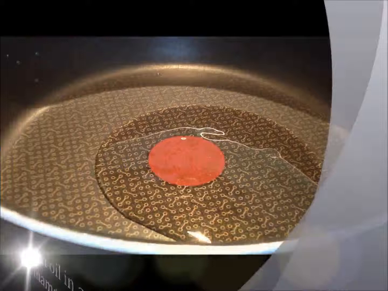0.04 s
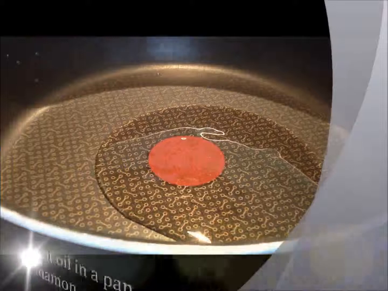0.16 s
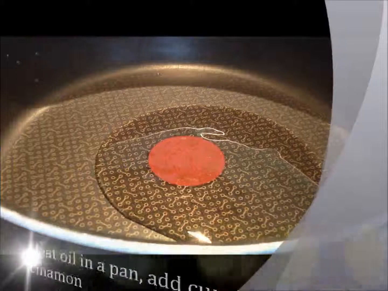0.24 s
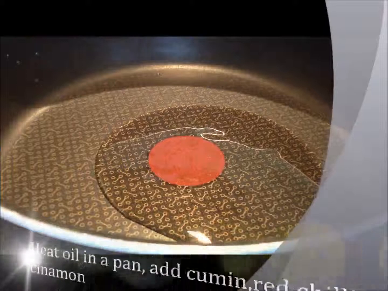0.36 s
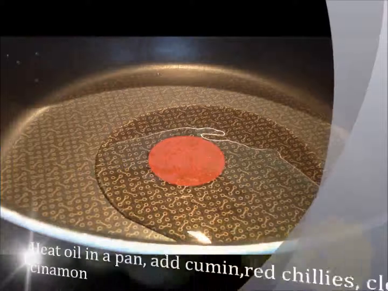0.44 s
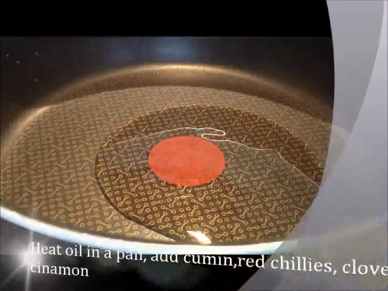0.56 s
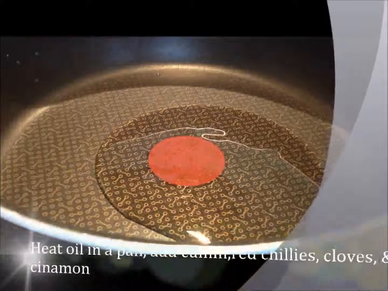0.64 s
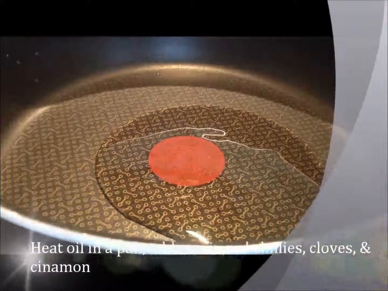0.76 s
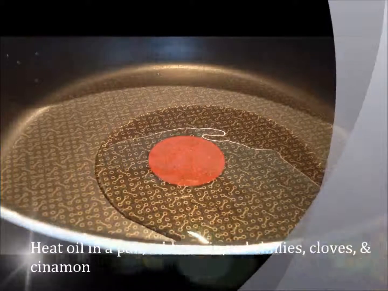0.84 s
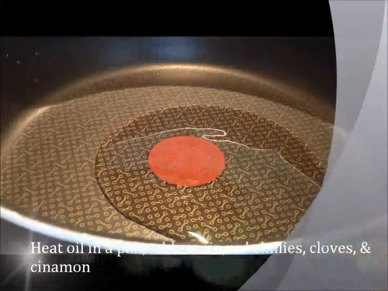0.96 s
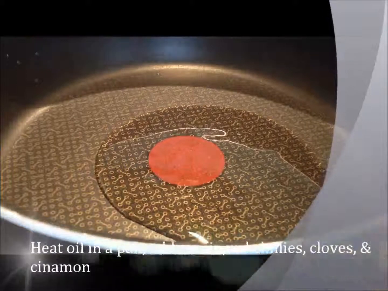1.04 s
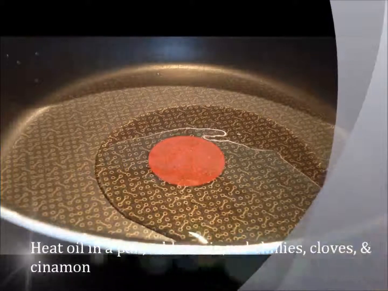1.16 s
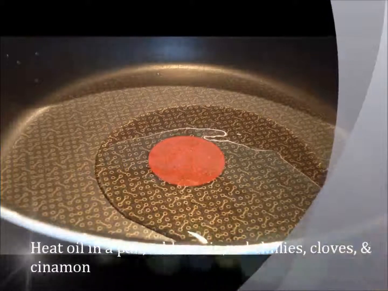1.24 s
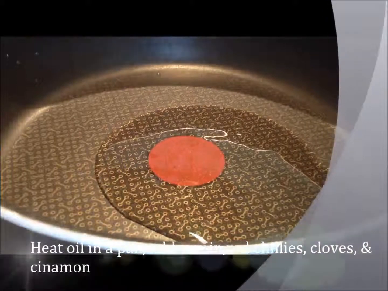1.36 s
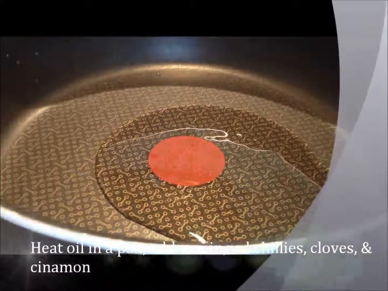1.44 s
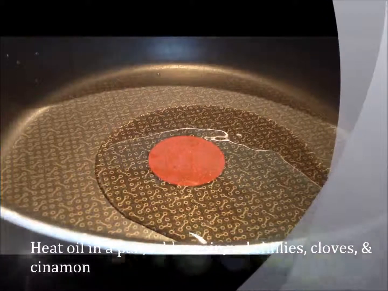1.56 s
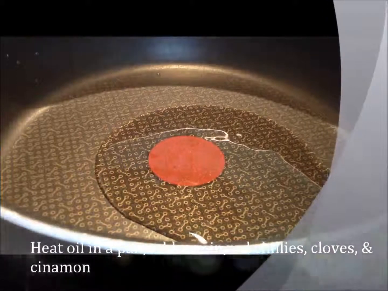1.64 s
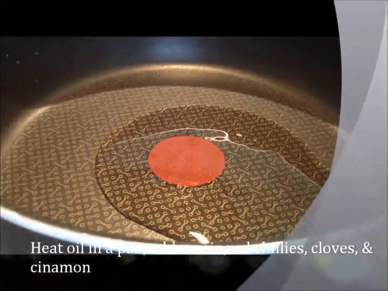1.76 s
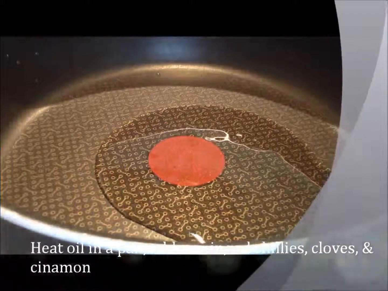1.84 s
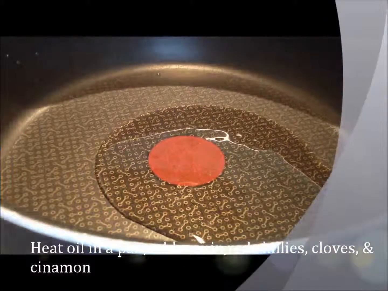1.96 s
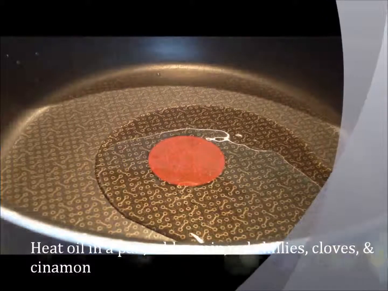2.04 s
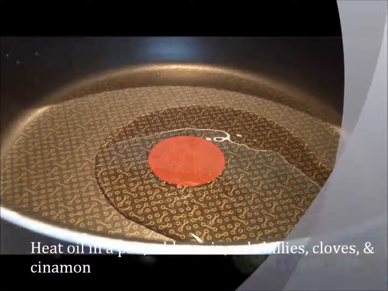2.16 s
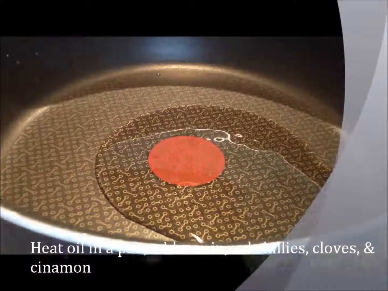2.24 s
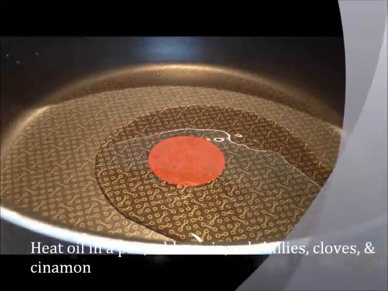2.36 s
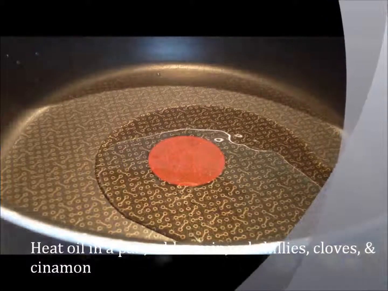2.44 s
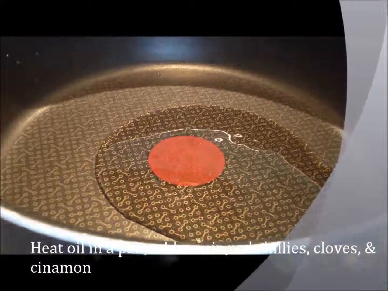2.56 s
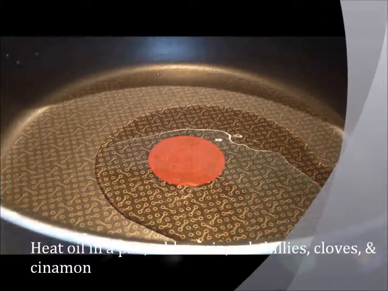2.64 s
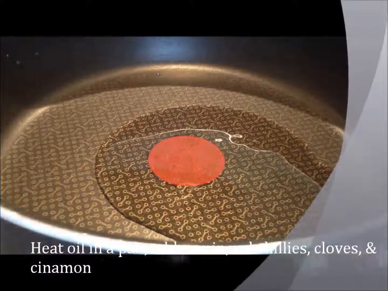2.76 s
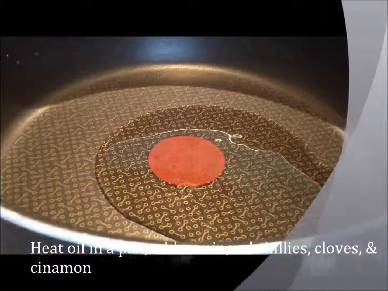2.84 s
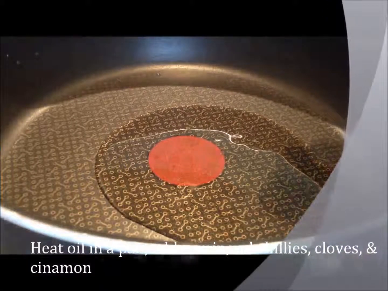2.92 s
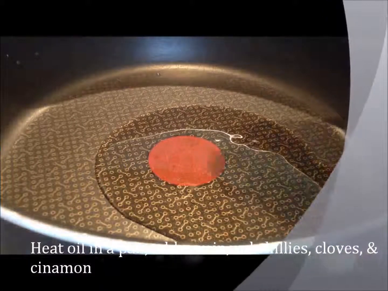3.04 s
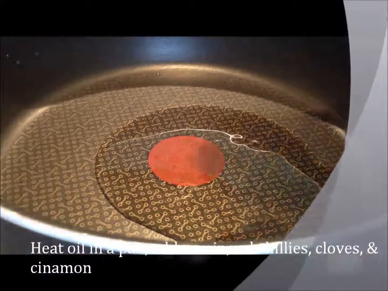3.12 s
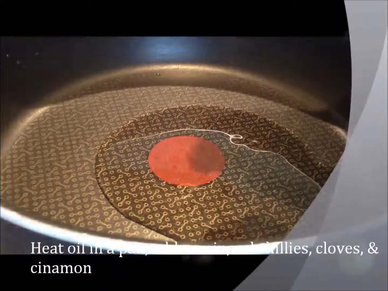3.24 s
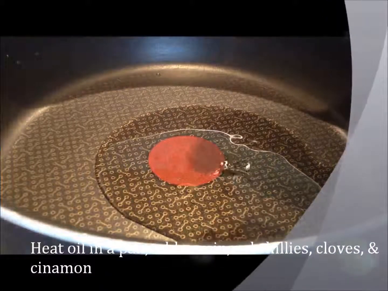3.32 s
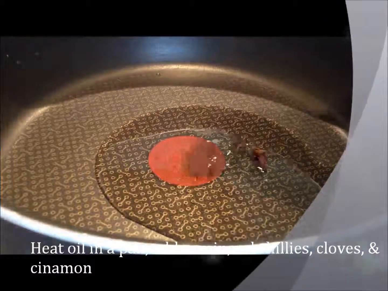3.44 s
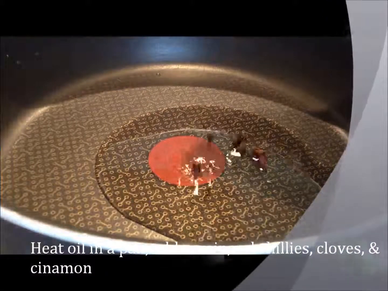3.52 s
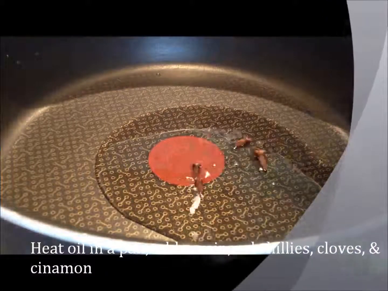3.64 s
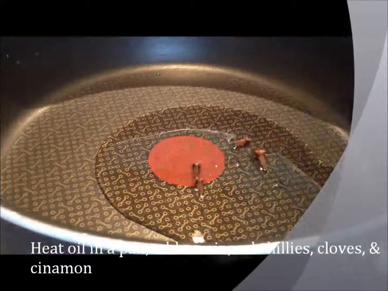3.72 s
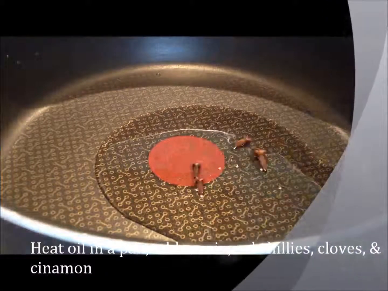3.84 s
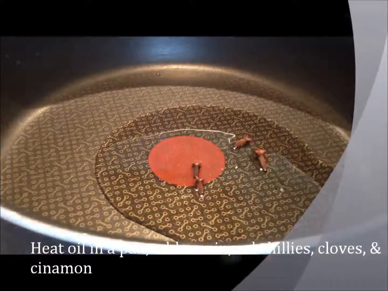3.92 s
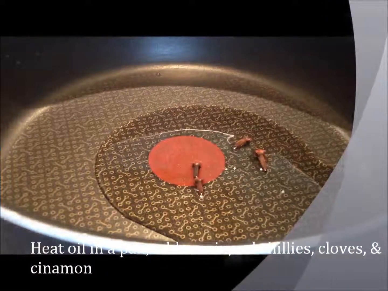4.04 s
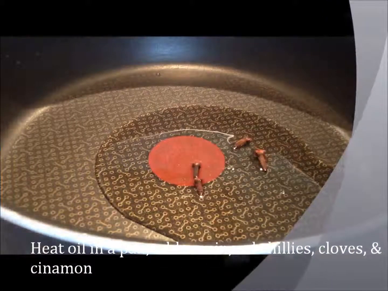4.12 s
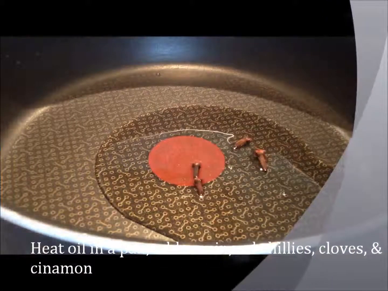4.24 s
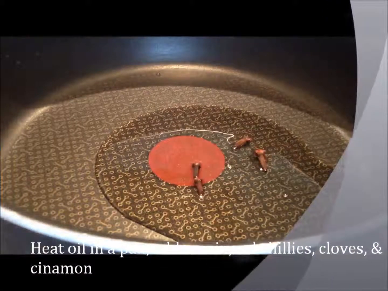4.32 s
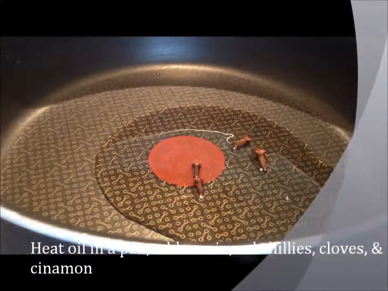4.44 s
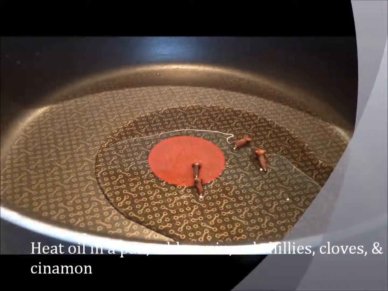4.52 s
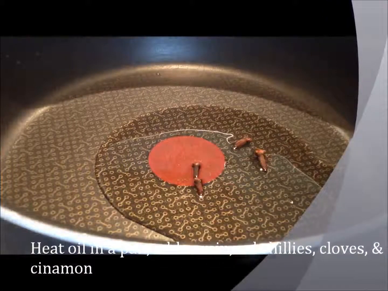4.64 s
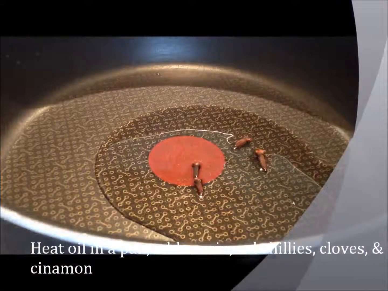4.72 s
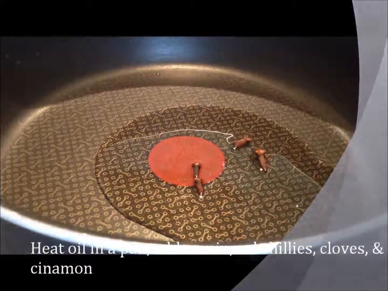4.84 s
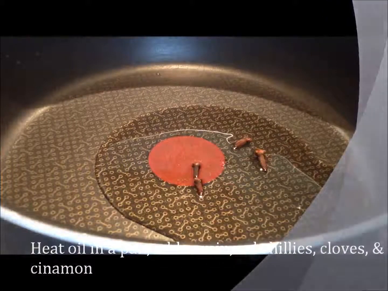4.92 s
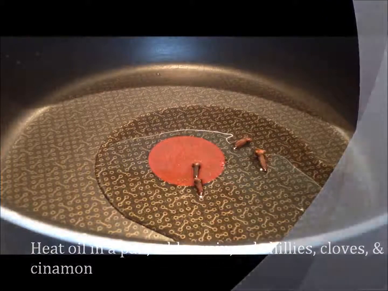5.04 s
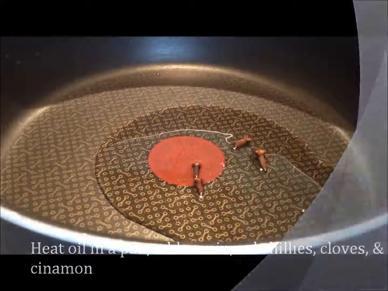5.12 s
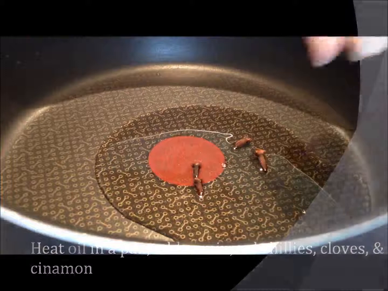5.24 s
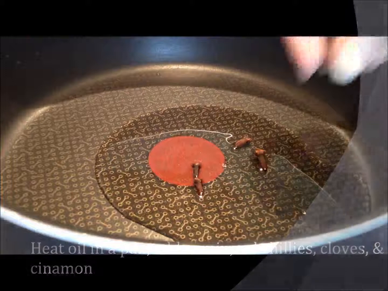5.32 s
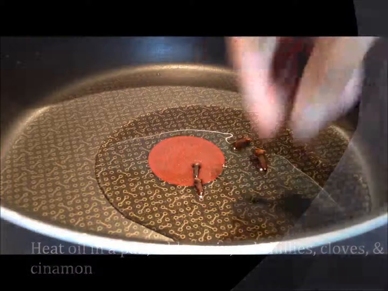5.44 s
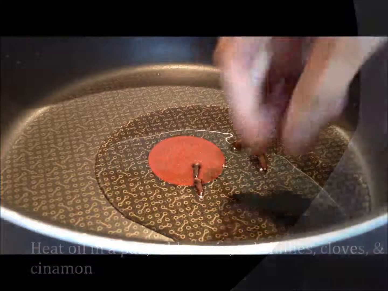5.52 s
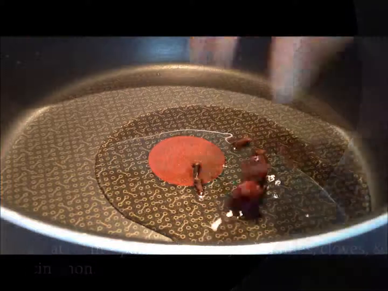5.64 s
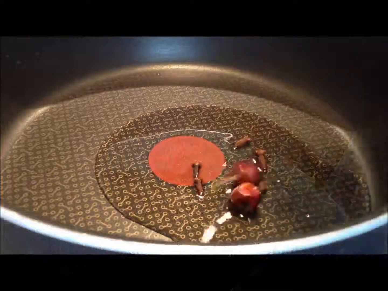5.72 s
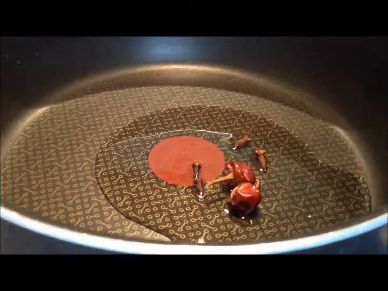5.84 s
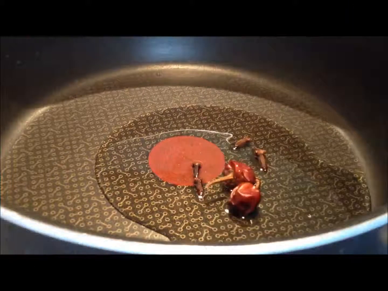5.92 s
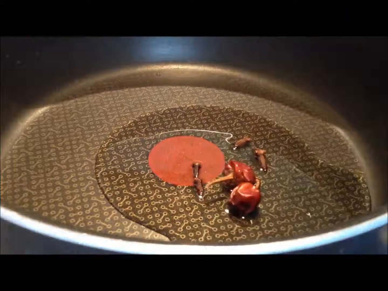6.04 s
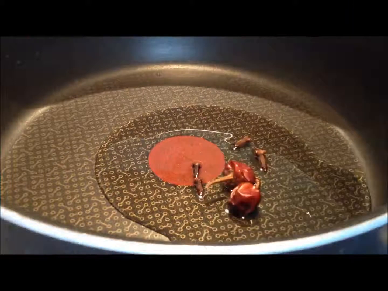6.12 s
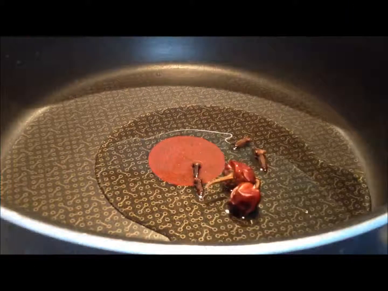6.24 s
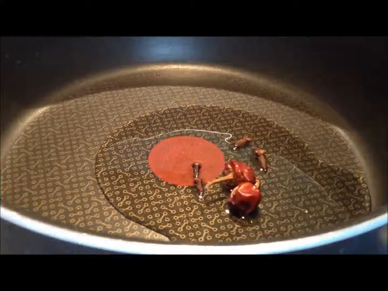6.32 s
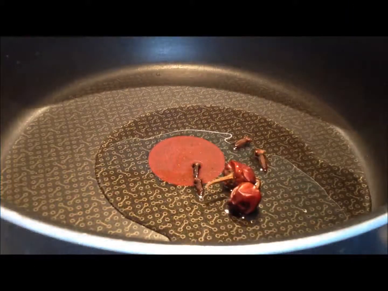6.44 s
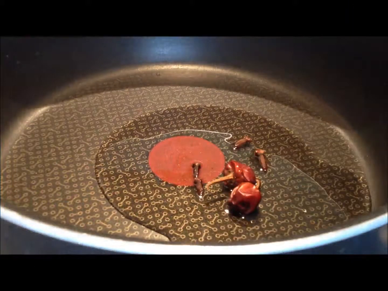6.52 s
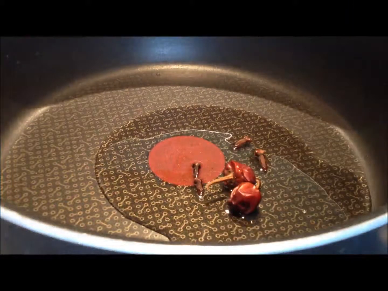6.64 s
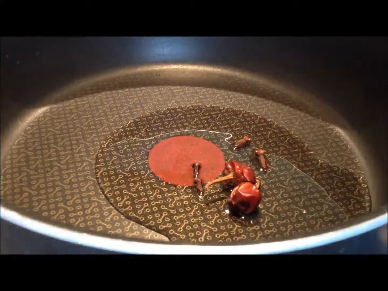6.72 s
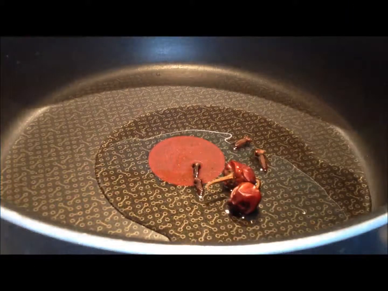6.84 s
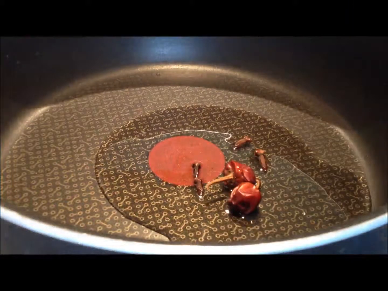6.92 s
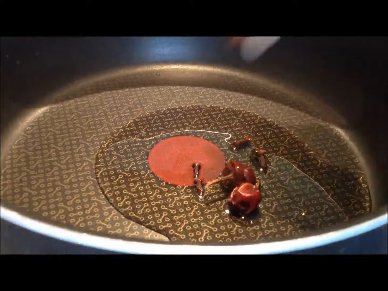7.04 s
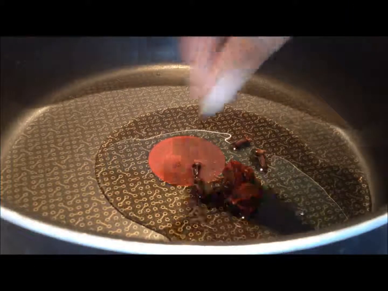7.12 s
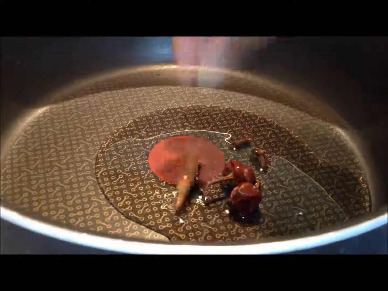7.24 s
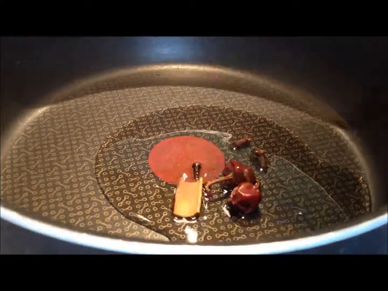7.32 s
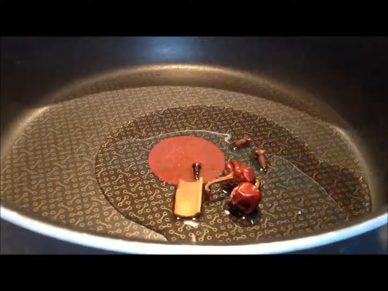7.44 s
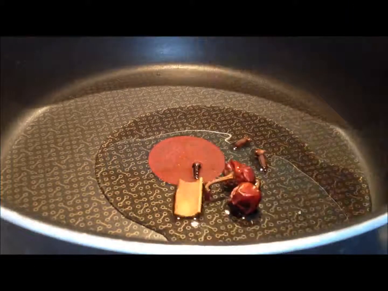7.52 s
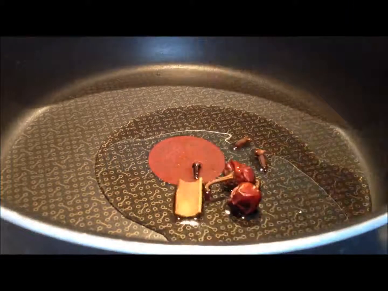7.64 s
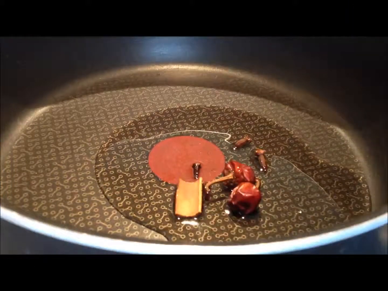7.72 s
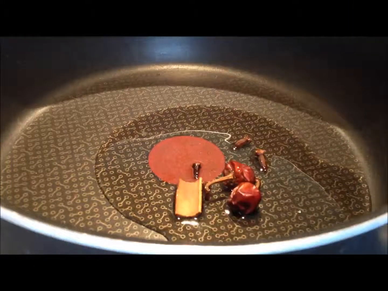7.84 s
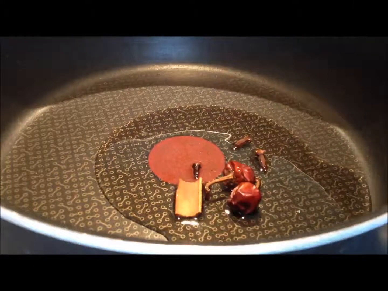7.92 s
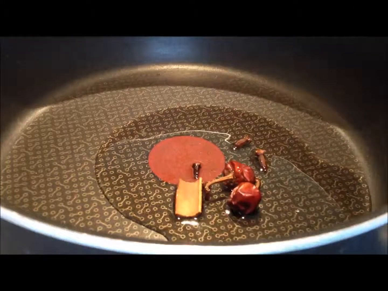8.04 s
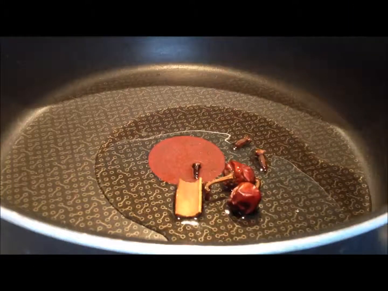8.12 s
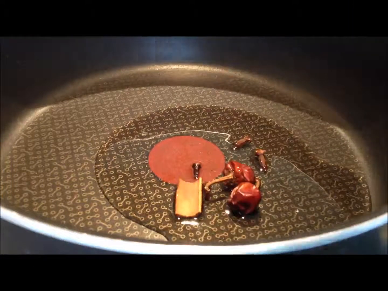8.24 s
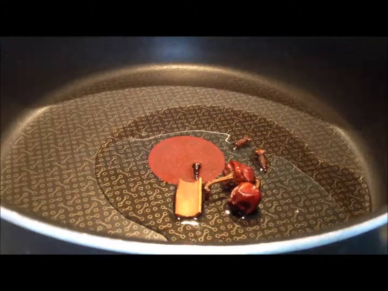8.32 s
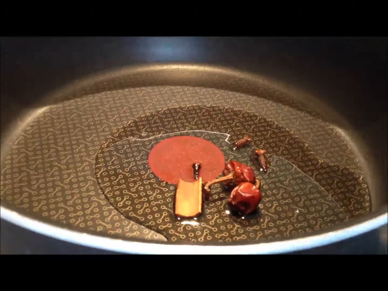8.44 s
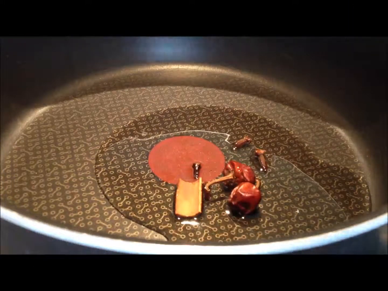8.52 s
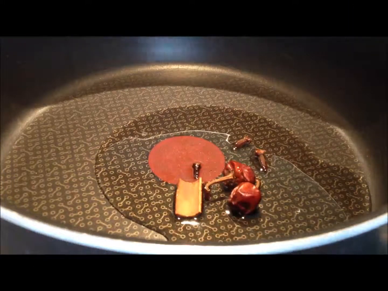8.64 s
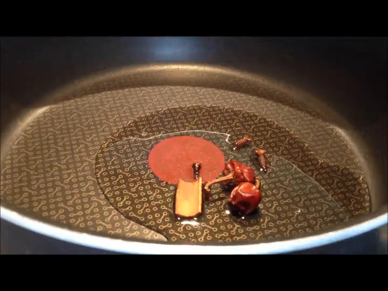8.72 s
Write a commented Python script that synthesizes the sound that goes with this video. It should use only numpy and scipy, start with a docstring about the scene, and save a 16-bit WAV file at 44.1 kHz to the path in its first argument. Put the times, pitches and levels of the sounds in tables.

```python
"""Dry spices in hot oil

Cloves, dried red chillies and a piece of cinnamon bark drop into a little hot oil in a nonstick pan.
Each landing is a tick and a crack of shaped noise over damped pan modes. Random snaps make the oil fizz and
the chillies rustle, and short noise bursts make it pop. A small kitchen adds rumble, hiss, a low drone, scuffs,
soft knocks and reflections; a gain control turns down the loudest landings."""
import sys
import numpy as np
from scipy import signal
from scipy.fft import rfft, irfft, next_fast_len
from scipy.io import wavfile
from scipy.ndimage import uniform_filter1d

SR = 44100
rng = np.random.default_rng(int(sys.argv[2]) if len(sys.argv) > 2 else 0)


def put_to_file(sound):
    """Save the sound as 16-bit audio at rate SR, in the file named by the first command-line argument."""
    columns = np.atleast_2d(sound).T  # one column per channel
    safe = np.clip(columns, -1, 1)
    whole_steps = np.round(safe * 32767)
    wavfile.write(sys.argv[1], SR, whole_steps.astype(np.int16))


N = 386757

# The bright colour of bursting bubbles and of the bursts of hiss after a landing.
# Each row: frequency in Hz, relative density in dB per Hz.
SPRAY = [(300, -29), (1100, -8), (2900, -6.5), (4500, -19), (6000, -20), (7800, 6), (9500, -11),
         (12000, -5), (14500, -5), (16000, -9)]


def amp(db):
    """Decibels to gain."""
    return 10 ** (np.asarray(db) / 20)


def unit(x):
    """Scales to rms 1."""
    return x / np.sqrt(np.mean(x ** 2) + 1e-20)


def read(points, hz):
    """Reads a spectrum on a log-frequency axis."""
    f, value = np.transpose(points)
    return np.interp(np.log(hz + 1), np.log(f + 1), value)


def colour(x, points):
    """Filters x by a spectrum in dB."""
    size = next_fast_len(len(x), True)
    gain = amp(read(points, np.fft.rfftfreq(size, 1 / SR)))
    return irfft(rfft(x, size) * gain, size)[:len(x)]


def white(size):
    """White noise of 0 dB per Hz."""
    return rng.standard_normal(size) * np.sqrt(SR / 2)


def add(mix, s, sound):
    """Mixes a sound in at time s, in seconds."""
    part = mix[round(s * SR):][:len(sound)]
    part += sound[:len(part)]


def arch(start, length):
    """A gain that swells from 0 to 1 and dies again within length seconds."""
    u = np.clip((np.arange(N) / SR - start) / length, 0, 1)
    return 4 * u * (1 - u)


def crackle(size, per_s, spread_db, spectrum):
    """A random train of tiny snaps, a few larger than the rest, scaled to rms 1."""
    size_db = spread_db * np.minimum(rng.exponential(1, size), 3)
    strength = amp(size_db) * rng.choice([-1, 1], size)
    snaps = strength * (rng.random(size) < per_s / SR)
    return unit(colour(snaps, spectrum))


def background(waver_db=1.0):
    """Low rumble and thin hiss with a few narrow singing bands; the level wavers a little."""
    # The steady floor. Each row: frequency in Hz, density in dB per Hz.
    floor = [(25, -116), (50, -109), (68, -105), (95, -91), (140, -81.5), (205, -80.5), (300, -89),
             (500, -95.5), (1200, -99), (1900, -100), (3700, -99), (4300, -105), (6300, -99), (10500, -105),
             (15000, -104)]
    # Bands that sing in the hiss. Each row: centre in Hz, width in Hz, density at the centre in dB per Hz.
    whines = [(1760, 160, -93), (3923, 63, -92), (5820, 200, -93.5), (6543, 153, -85), (12100, 250, -101),
              (14000, 290, -87), (14880, 190, -80.5)]
    hz = np.fft.rfftfreq(N, 1 / SR)
    power = amp(read(floor, hz)) ** 2
    for centre, width, db in whines:
        power = power + amp(db) ** 2 / (1 + ((hz - centre) / width) ** 2 * 2) ** 2
    waver = unit(irfft(rfft(white(N)) * (hz < 8), N))  # only movement slower than 8 Hz
    noise = irfft(rfft(white(N)) * np.sqrt(power), N)
    return noise * amp(waver_db * waver)


def drone():
    """A faint low sine that swells and fades, a little higher each time."""
    # Each row: start in seconds, length in seconds, pitch in Hz, rms level at the top of the swell in dB.
    drones = [(.42, 0.87, 81.5, -74.5), (1.15, 0.58, 86, -67.5), (1.85, 0.61, 97, -65.5)]
    t, out = np.arange(N) / SR, np.zeros(N)
    for s, length, hz, db in drones:
        out += np.sqrt(2) * amp(db) * arch(s, length) * np.sin(2 * np.pi * hz * t)
    return out


def kitchen(x, first_echo=0.0045):
    """Dense reflections from near walls: random taps after first_echo seconds, the treble dying first."""
    # Each row: frequency in Hz, decay time t60 in seconds.
    decay = [(200, 1), (1000, 0.59), (3000, 0.46), (7000, 0.41), (14000, 0.38)]
    taps = rng.choice([-1., 1.], SR // 2) * (rng.random(SR // 2) < 4000 / SR)
    taps *= np.arange(len(taps)) / SR > first_echo
    hz, t, z = signal.stft(taps, SR, nperseg=256)
    fade = amp(-60 * t / read(decay, hz)[:, None])
    tail = signal.istft(z * fade, SR, nperseg=256)[1]
    return signal.fftconvolve(x, tail / np.linalg.norm(tail))[:N]


def scuffs():
    """Faint scuffs of handling: grainy friction in one broad resonance."""
    # Each row: start in seconds, length in seconds, centre in Hz, width in Hz, rms level before the swell in dB.
    handling = [(0.211, 0.1, 1250, 500, -64), (0.29, 0.093, 3070, 250, -56.5),
                (0.298, 0.1, 1300, 2000, -57.5), (0.477, 0.17, 2130, 1400, -63.5)]
    out = np.zeros(N)
    for s, length, hz, width_hz, db in handling:
        size, r = int(length * SR), np.exp(-np.pi * width_hz / SR)
        grains = white(size) * (rng.random(size) < 1500 / SR)
        rub = signal.lfilter([1, 0, -1], [1, -2 * r * np.cos(2 * np.pi * hz / SR), r * r], grains)
        add(out, s, amp(db) * unit(rub) * np.hanning(size) ** .5)
    return out


def knocks():
    """Soft knocks around the stove: a damped resonance swells and dies in a few cycles, with a dull rattle."""
    # Each row: start in seconds, level in dB, resonance in Hz, rise in seconds,
    # level of the rattle against the knock in dB, decay time t60 of the rattle in seconds.
    bumps = [(1.478, -47.5, 444, 0.0018, 0.5, 0.052), (6.349, -45, 370, 0.0024, -1, 0.1),
             (6.684, -35.5, 1440, 0.0011, -11.5, 0.095), (6.693, -53.5, 415, 0.00078, 4, 0.074),
             (8.484, -30.5, 825, 0.00094, -10, .18), (8.4855, -36.5, 300, 0.0028, -13, 0.1),
             (8.4879, -21, 480, 0.0029, -25, 0.27)]
    # The colour of the rattle. Each row: frequency in Hz, relative density in dB per Hz.
    dull = [(80, -27), (250, 12.5), (900, 8.5), (1400, 2), (1900, -7), (2700, -8), (5000, -26)]
    out, t = np.zeros(N), np.arange(SR // 4) / SR
    for s, db, hz, rise, rattle_db, rattle_t60 in bumps:
        swell = (t / rise * np.exp(1 - t / rise)) ** 2
        body = swell * np.sin(2 * np.pi * hz * t)
        rattle_fade = amp(rattle_db - 60 * t / rattle_t60) * (1 - np.exp(-t / rise))
        rattle = unit(colour(white(len(t)), dull)) * rattle_fade
        add(out, s, amp(db) * (body + rattle))
    return out


def oil(simmer_db=-59, flare_t60=2.5, burst_t60=.09, puff_db=2.5):
    """Steam fizzes out of the oil in little puffs; after two landings hiss bursts out and the fizz swells."""
    # Spells of livelier simmering. Each row: start in seconds, length in seconds, level added at the top in dB.
    simmers = [(.78, 0.27, -58.5), (1.42, 0.18, -55), (2.498, 0.97, -59)]
    # Bursts of hiss after a landing: the clove's spray, the chilli's dry rustle.
    # Each row: start in seconds, first level of the livelier fizz in dB, first level of the burst in dB.
    flares = [(3.461, -51, -29), (5.601, -58, -35)]
    # The hiss of escaping steam. Each row: frequency in Hz, relative density in dB per Hz.
    hiss = [(500, -18), (2900, -7), (4500, -33.5), (6300, -3.5), (8000, -1), (9600, -8.5), (12000, -15.5),
            (16000, -10)]
    t = np.arange(N) / SR
    power = np.full(N, amp(simmer_db) ** 2)
    for s, length, db in simmers:
        power += (amp(db) * arch(s, length)) ** 2
    bursts, short = np.zeros(N), t[:SR // 4]
    for s, flare_db, burst_db in flares:
        add(power, s, amp(flare_db - 60 * t / flare_t60) ** 2)
        burst_fade = amp(burst_db - 60 * short / burst_t60)
        add(bursts, s, unit(colour(white(len(short)), SPRAY)) * burst_fade)
    # noise smoothed over about 30 ms puffs the steam up and down
    puffs = unit(signal.oaconvolve(white(N), np.hanning(1300), "same"))
    steam = unit(crackle(N, 3000, 2.7, hiss) * amp(puff_db * np.clip(puffs, -2, 2)))
    return steam * np.sqrt(power) + bursts


def pops(snap_db=7.0, snap_t60=0.012, spray_db=-5, spray_t60=0.068, tick_t60=0.022,
         tick_low_hz=900, tick_high_hz=3200, small_per_s=3, small_db=-61.5):
    """A bubble bursts with a sharp snap and a short spray; large ones tick on the pan, small ones come at random."""
    # The largest bubbles. Each row: start in seconds, level in dB (snap and spray are set against it),
    # first level of the tick on the pan in dB.
    bubbles = [(1.259, -44, -53), (2.148, -52, -58), (2.451, -45, -58), (2.600, -47.5, -62),
               (2.761, -46.5, -64), (3.669, -45.5, -69), (3.939, -49.5, -62), (4.318, -50, -53),
               (5.860, -46.5, -51), (6.238, -52, -45.5), (6.513, -45, -40.5), (7.108, -45.5, -50)]
    out, t = np.zeros(N), np.arange(SR // 8) / SR
    fade = amp(snap_db - 60 * t / snap_t60) + amp(spray_db - 60 * t / spray_t60)
    band = signal.butter(2, [tick_low_hz, tick_high_hz], "band", fs=SR, output="sos")
    for s, db, tick_db in bubbles:
        tick = unit(signal.sosfilt(band, white(len(t)))) * amp(tick_db - 60 * t / tick_t60)
        burst = unit(colour(white(len(t)), SPRAY)) * amp(db) * fade
        add(out, s, burst + tick)
    # small_db caps the random sizes
    small = (rng.random(N) < small_per_s / SR) * amp(small_db) * rng.random(N)
    return out + unit(colour(white(N), SPRAY)) * signal.oaconvolve(small, fade)[:N]


def skin(brightness):
    """The colour of a chilli's skin, tilted by so many dB per octave."""
    # Each row: frequency in Hz, relative density before the tilt in dB per Hz.
    papery = [(500, -36), (1500, -16), (2800, -11), (4300, -11.5), (6000, 0), (7400, 4), (9300, -2),
              (12000, 0), (14300, 0), (16000, -2)]
    return [(hz, db + brightness * np.log2(hz / papery[0][0])) for hz, db in papery]


def chillies(snaps_per_s=1300, spread_db=1.5, clump_db=2.0, crinkle_db=1.5, crinkle_rise=0.0018):
    """Papery skins rub in clumps of tiny snaps, each rub one swell, and now and then buckle."""
    # Chillies rub together in the hand and settle in the pan. Each row: start in seconds, length in seconds,
    # rms level before the swell in dB, brightness in dB per octave.
    rubs = [(4.06, 0.22, -43, 1.5), (4.359, 0.07, -46.5, -2.5), (4.418, 0.19, -55, 0),
            (4.558, 0.3, -47.5, 0), (4.686, 0.062, -47.5, -2.5), (4.837, 0.1, -41.5, -2),
            (4.94, 0.085, -43.5, -2), (5.01, 0.14, -50.5, 0), (5.195, 0.055, -46.5, -1.5),
            (5.27, 0.19, -42.5, 4), (5.466, 0.12, -46, -1), (5.58, .17, -42.5, 1)]
    # Skins buckle. Each row: start in seconds, relative level in dB (crinkle_db is added),
    # decay time t60 in seconds, brightness in dB per octave.
    crinkles = [(3.999, -39, 0.18, 1.5), (4.059, -29.5, 0.18, 4.5), (4.112, -29, 0.085, 0.5),
                (4.135, -34, 0.15, 1.5), (4.178, -37, 0.12, -1.5), (4.802, -33, 0.081, 2),
                (4.883, -29.5, 0.025, -1.5), (4.896, -35, 0.027, -1), (4.975, -36, 0.086, 2),
                (5.382, -36, 0.043, 2), (5.514, -30, 0.053, -0.5)]
    out = np.zeros(N)
    for s, length, db, brightness in rubs:
        size = int(length * SR)
        clumps = unit(uniform_filter1d(white(size), size=200))
        snaps = crackle(size, snaps_per_s, spread_db, skin(brightness))
        rub = unit(snaps * amp(clump_db * clumps))
        add(out, s, amp(db) * rub * np.sin(np.linspace(0, np.pi, size)))
    t = np.arange(SR // 4) / SR
    for s, db, t60, brightness in crinkles:
        snaps = crackle(len(t), 9000, 2.2, skin(brightness))
        fade = amp(db + crinkle_db - 60 * t / t60) * (1 - np.exp(-t / crinkle_rise))
        add(out, s, snaps * fade)
    return out


def landings(crack_db=-2.5, crack_t60=0.056, buzz_db=-27, buzz_t60=0.18, ring_db=-1, ring_rise=0.003,
             crack_rise=0.0012, clang_db=-17, clang_width_hz=85, clang_from_hz=4500, tick_db=-2.0, tick_t60=0.014):
    """A hard spice strikes the pan: a tick, a crack, a short bright clang, and the strong modes that ring on."""
    # The pitches of the pan's modes in Hz.
    pan_hz = [530, 1012, 1642, 2038, 2538, 2875, 3460, 3802, 3972, 4311, 5050, 5312, 5535, 5867, 5990, 6401,
              6600, 6735, 7066, 7208, 7440, 8003, 8089, 8690, 9890, 10075, 11240]
    # The ring of each mode; each spice strikes its own spot, and the bark lands on its tip, then falls flat.
    # Each row: decay time t60 in seconds, relative level in dB under a clove, a chilli, the bark's tip, its side.
    pan_modes = [(0.42, -44.5, -30, -29.5, -58), (0.13, -28.5, -11, -19, -21.5),
                 (0.13, -24, -7.5, -29, -18), (.13, -22.5, -23, -8, -44), (0.15, -34, -20, -17, -36.5),
                 (0.17, -17, -18, -15, -24.5), (0.12, -29, -24, -44, -42), (0.18, -32.5, -26, -51, -30.5),
                 (0.18, -59, -31, -23.5, -48), (0.14, -28, -51, -17.5, -40), (0.21, -32.5, -35, -29.5, -32),
                 (0.11, -26.5, -48, -42, -30), (0.14, -29, -49, -49, -52), (0.13, -21.5, -29, -31, -45),
                 (0.11, -30, -32, -26, -43), (0.05, -31, -21, -42, -37), (.15, -38, -46, -35.5, -34),
                 (0.13, -24, -33, -42, -38), (0.082, -29, -26.5, -29.5, -41), (0.086, -21.5, -43, -30, -39),
                 (.14, -42, -39, -50, -50), (0.1, -24, -44, -20.5, -50), (0.19, -35, -34, -33.5, -50),
                 (0.13, -31, -60.5, -34, -55), (0.058, -27.5, -43, -26, -58), (0.058, -28.5, -45, -32, -58),
                 (0.073, -28, -52, -49.5, -66)]
    # What strikes, in the order of the level columns.
    spices = ["clove", "chilli", "bark tip", "bark side"]
    # The crack of contact. Each row: frequency in Hz, relative density in dB per Hz for each of the spices.
    contacts = [(100, -84, -88, -91, -92), (332, -91, -79, -85.5, -77), (596, -58.5, -49, -51.5, -56),
                (1420, -66, -64, -53, -54.5), (2050, -60, -60, -53, -58), (3260, -57, -45, -41, -55.5),
                (4530, -60, -62, -55.5, -56.5), (6100, -46.5, -53.5, -37, -68), (8160, -61, -66, -51, -64),
                (9040, -61, -52, -52, -76), (9650, -64, -56.5, -65.5, -85), (12400, -59, -57.5, -55, -79),
                (15000, -69, -63, -70.5, -79)]
    # The struck spot favours some modes: the frequencies in Hz at which its extra levels stand.
    spot_hz = [530, 1010, 1640, 2040, 2900, 5000]
    # Landings and bounces. Each row: start in seconds, spice, force in dB, extra level in dB at each of spot_hz.
    strikes = [(3.2654, "clove", -4.5, 2, 5.5, -3, -5, 4, 0.43),
               (3.3187, "clove", 0, 5.5, -7, -7, 4, -1.5, 0.91),
               (3.4334, "clove", 0.5, 1.5, -4.5, -7, 3.5, -4, 0.3),
               (3.5721, "clove", -10.5, -14, 6.5, -13, 2, 0.5, 0.81),
               (5.5789, "chilli", 2, -2, -4.5, -4.5, -2, -4.5, 0.1),
               (7.1655, "bark tip", 1.5, -5, -4, -3.5, -1, -8.5, 0),
               (7.2218, "bark side", 1, -12, -2.5, -1.5, 11, -2.5, 0)]
    out, t = np.zeros(N), np.arange(SR // 2) / SR
    hz, bins = np.array(pan_hz), np.fft.rfftfreq(len(t), 1 / SR)
    t60, *mode_db = np.transpose(pan_modes)
    crack_hz, *contact_db = np.transpose(contacts)
    # each high mode stands in a cluster of quickly damped neighbours
    clusters = 1 / (1 + ((bins - hz[:, None]) / clang_width_hz) ** 2) ** 2
    clusters = clusters / (1 + (clang_from_hz / hz[:, None]) ** 4)
    # a fast crack, then a faint buzz that lasts longer
    fade = amp(crack_db - 60 * t / crack_t60) + amp(buzz_db - 60 * t / buzz_t60)
    fade = fade * (1 - np.exp(-t / crack_rise))
    for s, spice, force_db, *spot_db in strikes:
        k = spices.index(spice)
        level = mode_db[k] + np.interp(hz, spot_hz, spot_db) + ring_db
        swing = np.sin(2 * np.pi * (hz[:, None] * t + rng.random((len(hz), 1))))
        modes = amp(level[:, None] - 60 * t / t60[:, None]) * swing
        ring = modes.sum(0) * (1 - np.exp(-t / ring_rise))
        contact = np.c_[crack_hz, contact_db[k]]
        power = amp(read(contact, bins)) ** 2 + amp(level + clang_db) ** 2 @ clusters
        crack = irfft(rfft(white(len(t))) * np.sqrt(power), len(t)) * fade
        # the first instant of contact is brighter: the difference of neighbouring samples lifts the treble
        tick = np.diff(colour(white(len(t)), contact), prepend=0) * amp(tick_db - 60 * t / tick_t60)
        add(out, s, amp(force_db) * (ring + crack + tick))
    return out


def scene(pan_room_db=-16.0, knock_room_db=-21, knock_low_hz=110):
    """The pan close by, the knocks and scuffs beside it, the kitchen around them."""
    pan = landings() + oil() + pops() + chillies()
    low_cut = signal.butter(2, knock_low_hz, "high", fs=SR, output="sos")
    bumps = signal.sosfilt(low_cut, knocks() + scuffs())
    room = kitchen(amp(pan_room_db) * pan + amp(knock_room_db) * bumps)
    return (pan + bumps + room + background() + drone())[None]


def record(dry, threshold_db=-19, squeeze=0.18, drift_db_per_s=0.6, ceiling=.88, edge_hz=15300):
    """Gain control ducks at the loudest landings, then sinks slowly on; peaks are rounded, the top is cut."""
    # mean power over about 300 samples
    power = signal.lfilter([1 / 300], [1, 1 / 300 - 1], dry[0] ** 2)
    power_db = 10 * np.log10(abs(power) + 1e-12)
    # the loudest level so far is held and drifts upward, so the gain never recovers
    drift = np.arange(N) / SR * drift_db_per_s
    held_db = np.maximum.accumulate(power_db - drift) + drift
    over_db = np.maximum(held_db - threshold_db, 0)
    ducked = dry * amp(-squeeze * over_db)
    rounded = ducked / (1 + (ducked / ceiling) ** 6) ** (1 / 6)
    top_cut = signal.firwin(301, edge_hz, window=("kaiser", 8), fs=SR)
    return signal.oaconvolve(rounded, top_cut[None], "same")


dry = scene()
out = record(dry)
put_to_file(out)
```